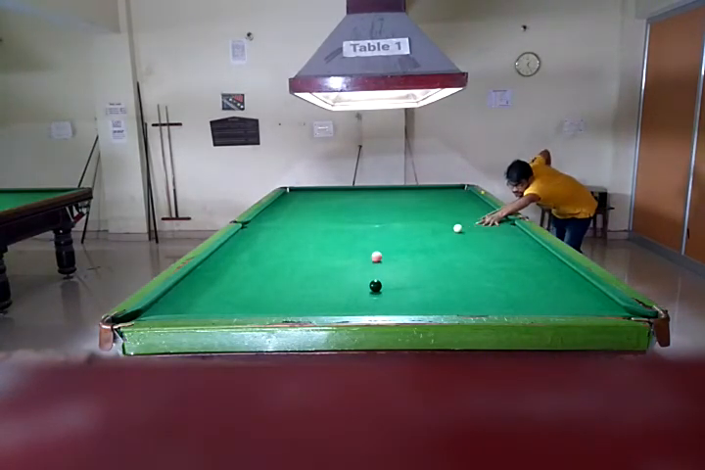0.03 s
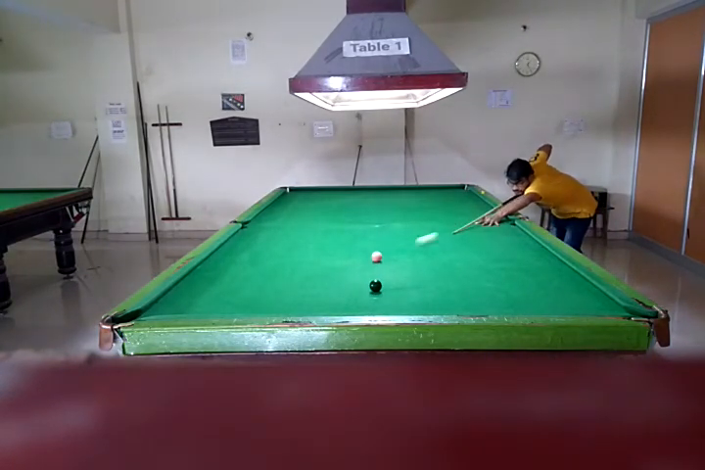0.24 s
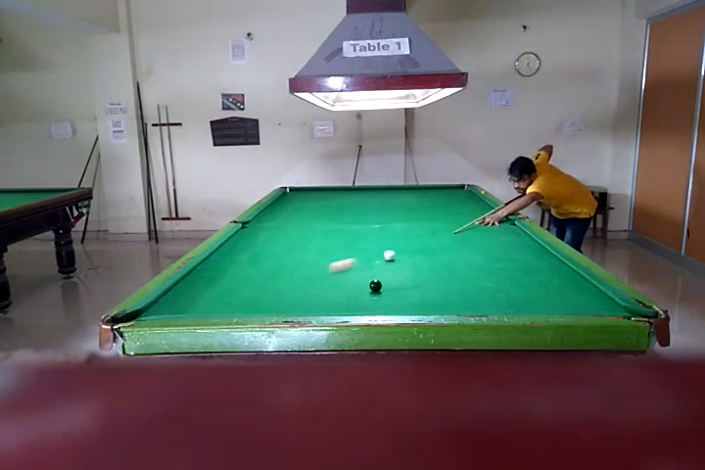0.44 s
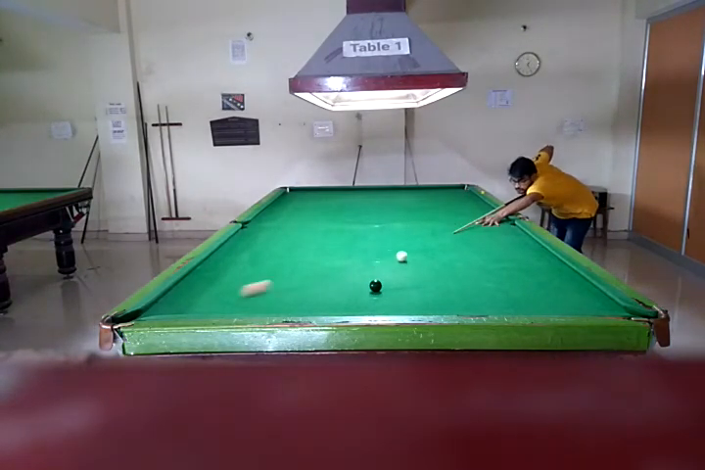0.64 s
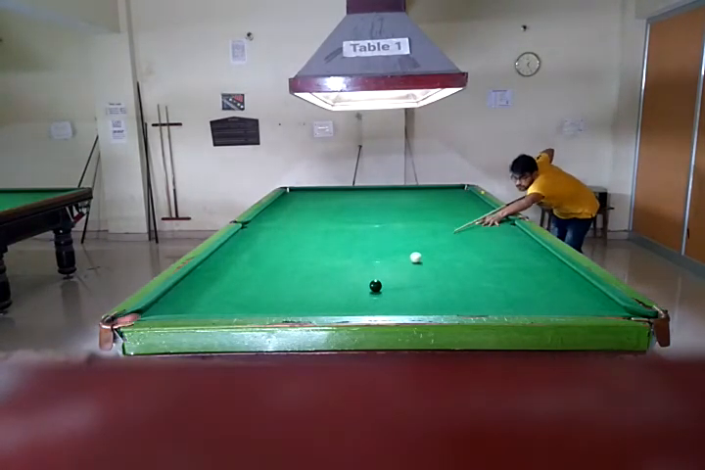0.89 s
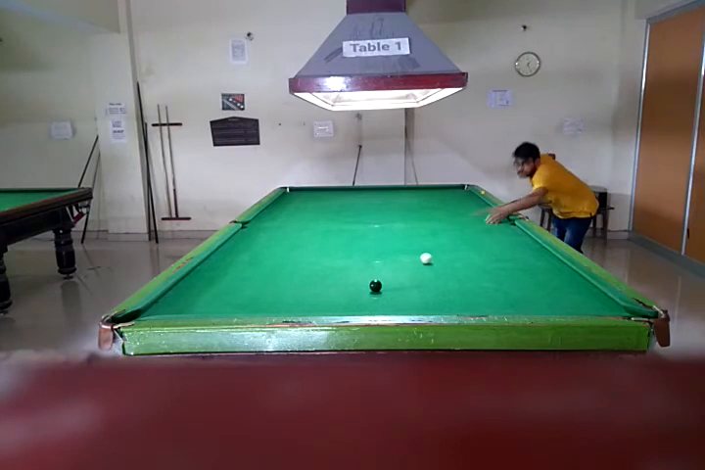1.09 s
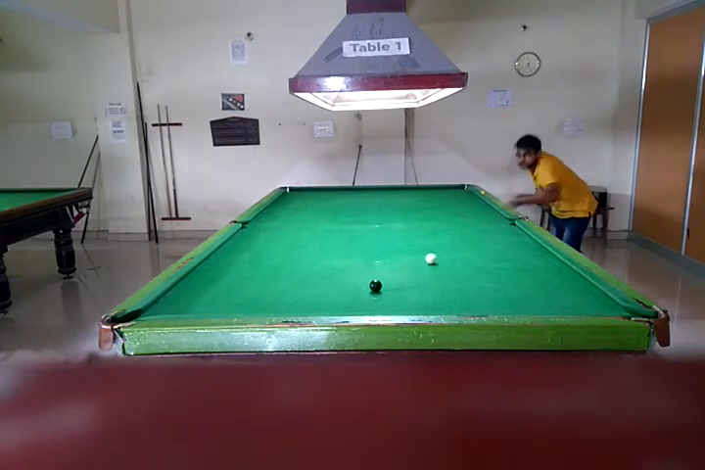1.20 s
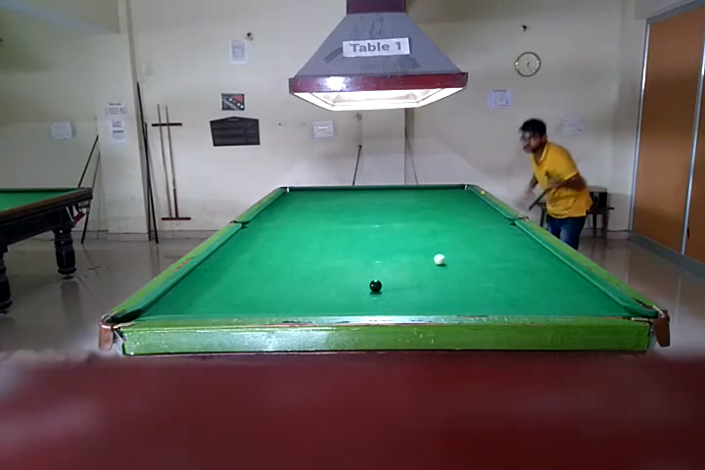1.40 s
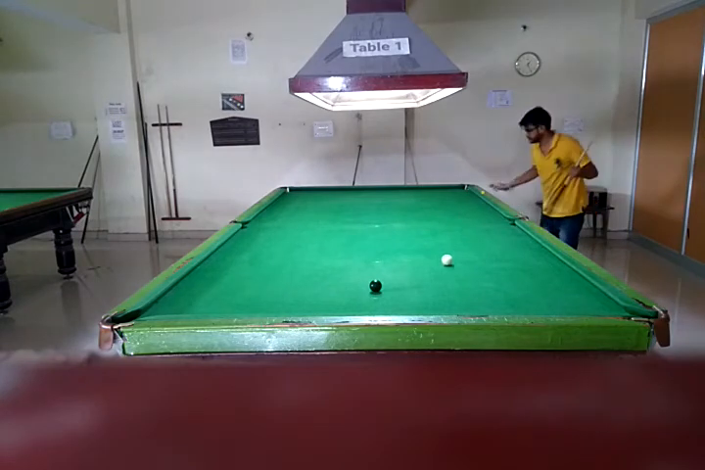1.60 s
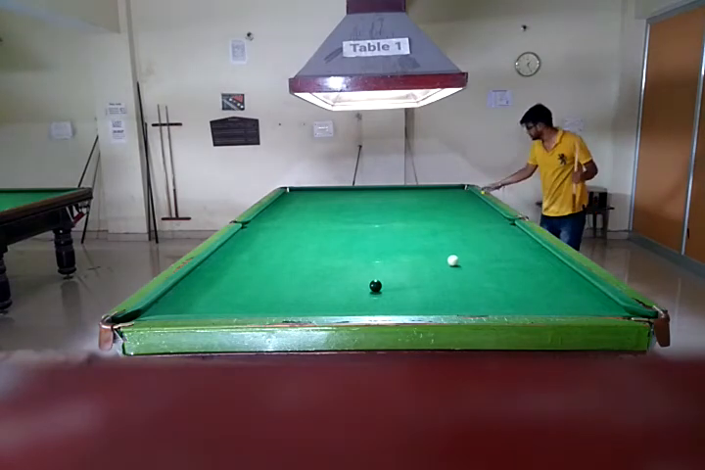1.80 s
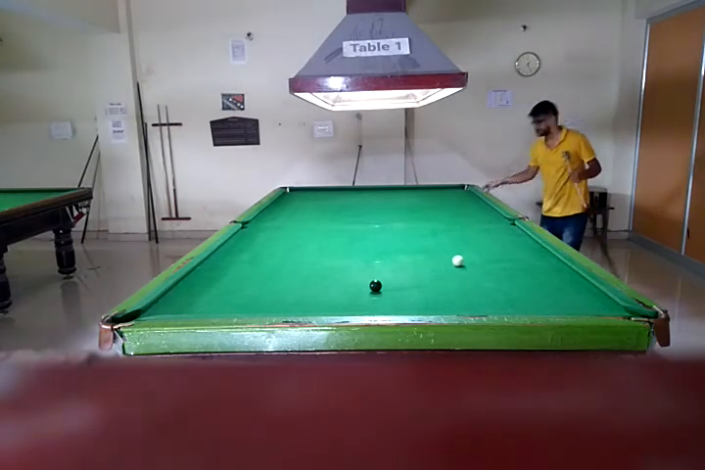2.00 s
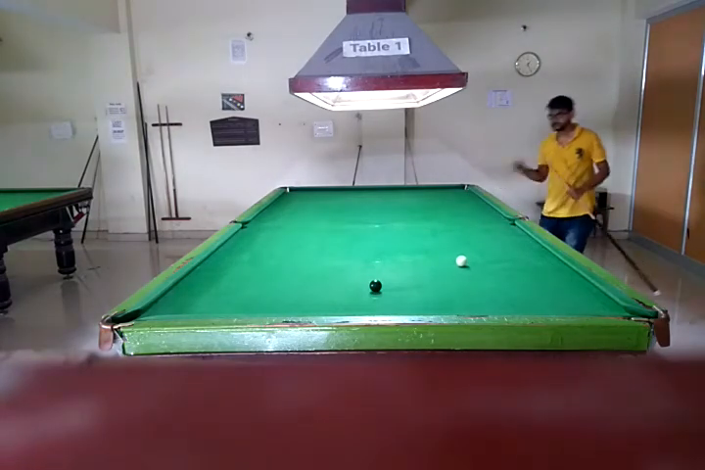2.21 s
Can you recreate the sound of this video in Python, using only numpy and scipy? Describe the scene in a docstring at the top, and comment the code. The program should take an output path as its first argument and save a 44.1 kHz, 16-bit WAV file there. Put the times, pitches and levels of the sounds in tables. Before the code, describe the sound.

A snooker shot sounds in a quiet hall, each hit leaving a short echo. The cue knocks at 0.2 seconds, and two balls crack sharply together at 0.4. After a faint roll over cloth, one scuffs, knocks and thuds into a pocket from 1.0 to 1.2 seconds. It skids down the rail and clicks against a resting ball at 1.6. One soft step follows near 1.9 seconds.

```python
"""A quiet, hard-walled hall, at the end of a snooker table: one shot.
The cue tip thumps, the shaft buzzes, and the cue ball cracks into a colour. That ball scuffs through
the jaws, knocks on the pocket frame and thuds into the net, then runs down the ball rail and clicks
against a ball resting there. A soft step follows. Under it all lie the hall's air and the low rumble
of balls on cloth; every hit leaves a short reverb tail."""
import sys
import numpy as np
from scipy import signal
from scipy.fft import rfft, irfft
from scipy.io import wavfile

SR = 44100
rng = np.random.default_rng(int(sys.argv[2]) if len(sys.argv) > 2 else 0)


def dump(signal):
    """Clip the signal to [-1, 1] and save it as 16-bit WAV at the path in sys.argv[1]."""
    limited = np.clip(np.atleast_2d(signal).T, -1, 1)
    pcm = np.round(limited * 32767).astype(np.int16)
    wavfile.write(sys.argv[1], SR, pcm)


N = 99225
PAD = 2 ** 18
HZ = np.maximum(np.arange(PAD // 2 + 1) * SR / PAD, 1)
TIME = np.arange(N) / SR


def from_db(db):
    """Decibels to gain."""
    return 10 ** (np.asarray(db) / 20)


def at_hz(points, hz):
    """Read a table on a log-frequency axis."""
    f, v = np.transpose(points)
    return np.interp(np.log(hz), np.log(f), v)


def fader(rows):
    """A (t/s, level/dB) curve as gain, silent outside."""
    s, db = np.transpose(rows)
    return from_db(np.interp(TIME, s, db, left=-np.inf, right=-np.inf))


def rms_one(x):
    """Scale to unit rms."""
    return x / np.sqrt(np.mean(x ** 2) + 1e-20)


def eq(x, curve):
    """Minimum-phase EQ: nothing rings ahead of a hit."""
    cepstrum = irfft(np.log(from_db(at_hz(curve, HZ))))
    cepstrum[1:PAD // 2] *= 2
    cepstrum[PAD // 2 + 1:] = 0
    return irfft(rfft(x, PAD) * np.exp(rfft(cepstrum)))[..., :N]


def clicks(rows):
    """One impulse for each (t/s, level/dB)."""
    out = np.zeros(N)
    for s, db in rows:
        out[int(s * SR)] += from_db(db)
    return out


def chatter(x, decay_s):
    """Spread each contact into a short dying buzz of the same energy."""
    buzz = rng.standard_normal(N) * np.exp(-TIME / decay_s)
    return signal.fftconvolve(x, buzz / np.linalg.norm(buzz))[:N]


def resonant(x, rings):
    """Add a body's resonances to what excites it."""
    return x + sum(from_db(db) * signal.lfilter(*signal.iirpeak(hz, hz / width, fs=SR), x)
                   for hz, width, db in rings)


def panned(x, pan_db):
    """Mono to stereo; positive is left."""
    return x * from_db(np.array([[pan_db], [-pan_db]]) / 2)


# stereo image of the hall: f/Hz, left-right correlation
HALL_CORRELATION = [(60, .8), (200, 0.95), (480, 0.71), (950, 0.18), (1900, -0.054), (8000, 0.11)]

def diffuse(pair):
    """Two unrelated noises become a diffuse field: narrow in the bass, wide in the treble."""
    a, b = rfft(pair, PAD, axis=1)
    alike = at_hz(HALL_CORRELATION, HZ)
    mid, side = a * np.sqrt((1 + alike) / 2), b * np.sqrt((1 - alike) / 2)
    return irfft(np.array([mid + side, mid - side]))[:, :N]


# dark room tone: f/Hz, level/dB
AIR_EQ = [(20, -23), (55, -3), (120, -0.5), (290, -0.5), (500, -3), (1000, -4), (2000, -12), (4000, -19.5),
          (8000, -29), (10500, -41.5), (16000, -38)]

def air():
    """The hall's air, a faint steady bed of diffuse noise."""
    return from_db(-69) * rms_one(eq(diffuse(rng.standard_normal((2, N))), AIR_EQ))


# swells of the roll: t/s, level/dB
ROLL_FADER = [(.1, -76), (.25, -65.5), (.44, -56.5), (.55, -67), (.63, -59), (.69, -72.5), (.97, -68.5),
              (1.65, -80), (1.83, -65), (1.92, -83), (2.2, -100)]
# its low rumble: f/Hz, level/dB
ROLL_EQ = [(40, -25), (100, -5), (170, -1.5), (320, 3), (600, -11), (1500, -28.5), (8000, -60)]

def roll():
    """Balls rumble softly over the cloth."""
    return rms_one(eq(diffuse(rng.standard_normal((2, N))), ROLL_EQ)) * fader(ROLL_FADER)


# reverb time of the hall: f/Hz, t60/s
HALL_DECAY = [(200, 0.44), (800, 0.86), (1600, 0.76), (2900, 0.9), (4200, 0.69), (6000, 0.76),
              (13000, 0.71)]

def hall(x, t60_scale=1.0):
    """Reverb: scattered echoes thicken into a tail that dies band by band."""
    predelay_s, attack_s, scatter_s = 0.0034, 0.0054, 0.046
    density = np.clip(TIME / scatter_s, .1, 1) ** 2
    echoes = rng.standard_normal((2, N)) * (rng.random((2, N)) < density) / np.sqrt(density)
    field = rfft(diffuse(echoes))
    centres = np.sort([hz for hz, t60 in HALL_DECAY])
    hz = np.maximum(np.arange(N // 2 + 1) * SR / N, 1)
    attack = np.clip((TIME - predelay_s) / attack_s, 0, 1)
    response = 0
    for centre, share in zip(centres, np.eye(len(centres))):
        band = irfft(field * np.interp(np.log(hz), np.log(centres), share), N)
        envelope = attack * from_db(-60 * TIME / (t60_scale * at_hz(HALL_DECAY, centre)))
        response = response + band * envelope / np.linalg.norm(envelope)
    return signal.fftconvolve(x[None], response, axes=1)[:, :N]


# the tip's thump, then the shaft's clacks: t/s, level/dB
TIP_HIT = [(.2213, -5)]
SHAFT_HITS = [(.2268, -0.5), (.2415, -7)]
# tone of the tip and of the shaft: f/Hz, level/dB
TIP_EQ = [(50, -24), (130, -14.5), (220, -4), (350, -12), (500, 9.5), (750, -2.5), (1000, 9), (1600, 4.5),
          (3000, -5.5), (4300, -5.5), (7000, -24), (16000, -46)]
SHAFT_EQ = [(50, -28), (200, -10.5), (350, -11.5), (520, 0), (850, 7.5), (1150, 7), (1900, -0.5),
            (2600, 3.5), (4300, 0.5), (6000, -4), (8000, -16), (11000, -23.5), (16000, -30.5)]
# resonances of the shaft: f/Hz, width/Hz, level/dB
SHAFT_PEAKS = [(829, 120, -0.5), (1550, 130, 4), (1740, 100, 2), (2330, 180, 7.5), (3040, 120, 5),
               (3700, 590, 2), (4190, 130, 1), (6510, 400, -1.5), (7690, 300, 1.5)]

def cue():
    """The leather tip thumps on the cue ball and the shaft buzzes, far off and mostly reverb."""
    tip = eq(.5 * clicks(TIP_HIT) + chatter(clicks(TIP_HIT), decay_s=0.0055), TIP_EQ)
    buzz = chatter(clicks(SHAFT_HITS), decay_s=0.006)
    shaft = eq(resonant(buzz, SHAFT_PEAKS), SHAFT_EQ)
    direct = from_db(-6) * tip + from_db(-9) * shaft
    return panned(direct, pan_db=-1) + from_db(0.6) * hall(tip + shaft, t60_scale=0.93)


# early reflections off the walls: delay/s, level/dB, pan/dB
WALL_ECHOES = [(.0058, -14.5, -5), (0.0107, -30.5, -4.5), (0.0111, -15, 3.5), (0.0162, -24, 0.5),
               (0.0268, -10.5, 0.5), (.0302, -21, -2.5), (0.042, -17, 5)]

def ball_click(hit, curve, direct_db, hall_db, echo_db, t60_scale):
    """One very short contact between two balls, its wall echoes and its tail."""
    s, db, pan_db = hit
    click = eq(clicks([(s, db)]), curve)
    walls = sum(panned(from_db(loss) * np.pad(click, (int(lag * SR), 0))[:N], side)
                for lag, loss, side in WALL_ECHOES)
    direct = from_db(direct_db) * panned(click, pan_db)
    return direct + from_db(echo_db) * walls + from_db(hall_db) * hall(click, t60_scale)


# ball on ball: t/s, level/dB, pan/dB
CRACK_HIT = (.4331, 0, -3.5)
# reflections off the lamp shade: delay/s, level/dB
SHADE_TAPS = [(.0032, -6), (.00342, -5)]
# the hard crack and its brighter reflections: f/Hz, level/dB
CRACK_EQ = [(50, -28), (110, -14), (190, -5), (300, -4), (470, -15), (750, -6.5), (1100, 0.5), (1600, 9),
            (2300, 15), (3000, 15.5), (4200, 7.5), (6000, -6), (7800, -27.5), (11000, -35), (16000, -48.5)]
SHADE_EQ = [(100, -28.5), (1500, -11.5), (2500, 5.5), (3400, 3.5), (5000, 5.5), (6300, 4), (8000, -28.5),
            (16000, -42)]

def crack():
    """The cue ball meets the colour; the lamp shade throws back two bright copies."""
    s, db, pan_db = CRACK_HIT
    shade = eq(clicks([(s + lag, db + loss) for lag, loss in SHADE_TAPS]), SHADE_EQ)
    click = ball_click(CRACK_HIT, CRACK_EQ, direct_db=0, hall_db=4.3, echo_db=-2, t60_scale=1.02)
    return click + panned(shade, pan_db)


# swell of the scuff: t/s, level/dB
SCUFF_FADER = [(.976, -74), (.988, -53.5), (1.015, -50), (1.035, -58.5), (1.047, -72)]
# ticks at the mouth, bumps on the jaws: t/s, level/dB
TICK_HITS = [(.9805, -9), (.997, -3)]
JAW_HITS = [(.9885, -6.5), (1.006, -7.5), (1.0155, -5.5), (1.022, -4), (1.0325, -3.5)]
# soft scuff, thin ticks, dull bumps: f/Hz, level/dB
SCUFF_EQ = [(80, -30), (260, -8), (430, -4.5), (610, 4.5), (800, 2.5), (1100, -13), (1700, -26.5),
            (2750, -8), (4300, -32.5), (6500, -24), (9000, -34.5), (16000, -60)]
TICK_EQ = [(500, -55), (4300, -41), (6100, -24), (8000, -41), (16000, -62)]
JAW_EQ = [(80, -38), (180, -29), (270, -10.5), (400, -3), (580, 7), (740, -2), (1000, -27), (1600, -38),
          (3000, -49), (16000, -82)]

def pocket_mouth():
    """The ball scuffs along the cloth and bumps the rubber jaws, with two dry ticks."""
    scuff = rms_one(eq(rng.standard_normal(N), SCUFF_EQ)) * fader(SCUFF_FADER)
    ticks = eq(clicks(TICK_HITS), TICK_EQ)
    bumps = eq(clicks(JAW_HITS), JAW_EQ)
    return panned(bumps + scuff + ticks, pan_db=-1.5) + hall(bumps + scuff, t60_scale=0.44)


# knocks on the frame, thuds in the net: t/s, level/dB
FRAME_HITS = [(1.0625, -4.5), (1.0675, -4.5), (1.0755, -3), (1.082, -28), (1.129, -7.5)]
NET_HITS = [(1.069, -3.5), (1.0866, -5.5), (1.097, -1), (1.104, -2), (1.111, 2), (1.157, -3.5),
            (1.229, -8.5)]
# mid-heavy frame, muffling net: f/Hz, level/dB
FRAME_EQ = [(80, -30), (250, -35), (450, 2.5), (750, 5.5), (1100, 10.5), (1520, 1.5), (1850, 1),
            (2300, -12), (3200, -19.5), (4000, -36), (6500, -34), (10000, -71), (16000, -71)]
NET_EQ = [(60, -14), (200, -8), (300, 1.5), (1100, 0), (2200, -4), (5000, -30), (16000, -58.5)]
# modes of the pocket: f/Hz, level/dB, t60/s
POCKET_RING = [(261.4, -47, 0.091), (383.3, -39, 0.081), (498, -38, 0.052), (585, -44, 0.027),
               (666, -38.5, 0.11), (898, -36.5, 0.044), (1079, -46.5, 0.12)]

def pocket():
    """Rattling knocks on the frame, then thuds, softened by the net, that set the pocket ringing."""
    contacts = clicks(FRAME_HITS)
    knocks = eq(0.55 * contacts + 0.59 * chatter(contacts, decay_s=0.0046), FRAME_EQ)
    ring = 0
    for hz, db, t60 in POCKET_RING:
        radius, angle = np.exp(-np.log(1000) / (t60 * SR)), 2 * np.pi * hz / SR
        blows = clicks([(s, force + db + rng.normal(0, 0.78)) for s, force in NET_HITS])
        mode = signal.lfilter([.5, 0, -.5], [1, -2 * radius * np.cos(angle), radius ** 2], blows + 1e-18)
        ring = ring + rng.choice([-1, 1]) * mode
    thuds = eq(ring, NET_EQ)
    direct = knocks + from_db(1) * thuds
    return panned(direct, pan_db=-1.5) + hall(from_db(3.5) * knocks + thuds, t60_scale=0.97)


# the fading run down the rail: t/s, level/dB
RAIL_FADER = [(1.197, -99), (1.202, -41), (1.216, -36), (1.25, -41), (1.29, -43.5), (1.345, -56),
              (1.39, -46.5), (1.45, -49.5), (1.49, -66), (1.56, -63)]
# its broad rasp: f/Hz, level/dB
RAIL_EQ = [(40, -14), (80, -4.5), (160, -17), (300, -10.5), (500, -9.5), (1100, 0), (1600, -6),
           (2400, -5.5), (4000, -1.5), (6200, -2), (8000, -12.5), (11000, -20.5), (16000, -33)]
# resonances of the rods: f/Hz, width/Hz, level/dB
ROD_PEAKS = [(548, 30, 7), (638, 220, 8.5), (1062, 68, 10), (1250, 90, 6), (1945, 110, 11), (2330, 71, 10),
             (2646, 85, 4.5)]

def rail():
    """The ball skids down the rail: dense tiny contacts ring the rods."""
    grains_per_s = 2700
    grains = (rng.random(N) < grains_per_s / SR) * rng.standard_normal(N)
    skid = rms_one(eq(resonant(grains, ROD_PEAKS), RAIL_EQ)) * fader(RAIL_FADER)
    return from_db(-7) * panned(skid, pan_db=-5.0) + from_db(1.5) * hall(skid, t60_scale=0.61)


# click on the resting ball: t/s, level/dB, pan/dB
STOP_HIT = (1.6216, 0, -1.9)
# both balls settle against the rail's end: t/s, level/dB
SETTLE_HITS = [(1.655, -1), (1.668, -1.5)]
# sharp click, softer settling: f/Hz, level/dB
STOP_EQ = [(100, -27), (600, -30), (1100, -12), (1650, -27), (2300, -11.5), (3100, -2), (3900, -6.5),
           (5000, -28), (8000, -48), (12000, -77), (16000, -85)]
SETTLE_EQ = [(100, -33), (600, -20), (1300, -16), (2000, -10.5), (3600, -13), (5000, -17.5), (7000, -27.5),
             (10000, -45.5), (16000, -70)]

def rail_end():
    """Below the table the ball clicks against one at rest; their settling is all reverb."""
    click = ball_click(STOP_HIT, STOP_EQ, direct_db=-7, hall_db=7.3, echo_db=-1, t60_scale=.7)
    return click + hall(eq(clicks(SETTLE_HITS), SETTLE_EQ), t60_scale=0.59)


# the footfall: t/s, level/dB
STEP_HIT = [(1.948, -8)]
# its dull body: f/Hz, level/dB
STEP_EQ = [(40, -33), (130, -11.5), (250, -6), (500, -35), (1200, -34), (4000, -59), (16000, -80)]

def step():
    """One soft step, a low thump in the centre."""
    thump = eq(clicks(STEP_HIT), STEP_EQ)
    return thump + from_db(-3) * hall(thump)


def scene():
    """The whole shot over the room tone."""
    return air() + roll() + cue() + crack() + pocket_mouth() + pocket() + rail() + rail_end() + step()


# tilt between the microphones: f/Hz, left minus right level/dB
MIC_TILT = [(40, 1), (200, 2.5), (600, 2), (1100, 1.5), (1900, 0), (3200, -2), (4700, -3), (6500, -4.5),
            (8700, -7), (12500, 0.5)]

def record(dry):
    """A stereo pair, the right microphone the brighter; a steep low-pass cuts the top."""
    pair = np.array([eq(channel, [(hz, side * db / 2) for hz, db in MIC_TILT])
                     for channel, side in zip(dry, (1, -1))])
    stopband_hz = 16600
    return signal.sosfilt(signal.cheby2(14, 60, stopband_hz, fs=SR, output="sos"), pair)


dry = scene()
out = record(dry)
dump(out)
```